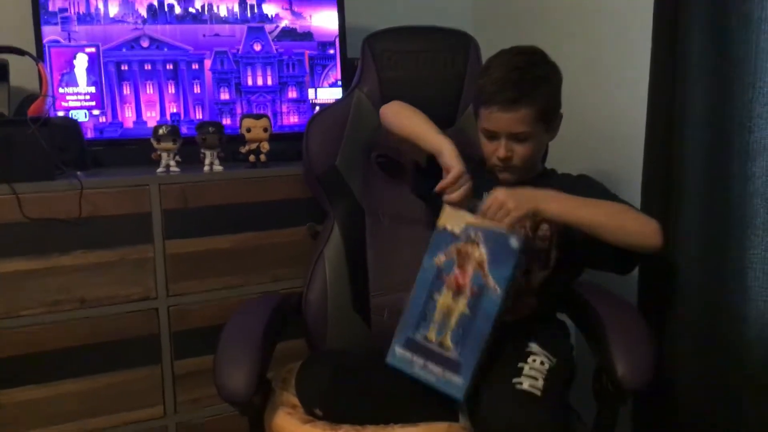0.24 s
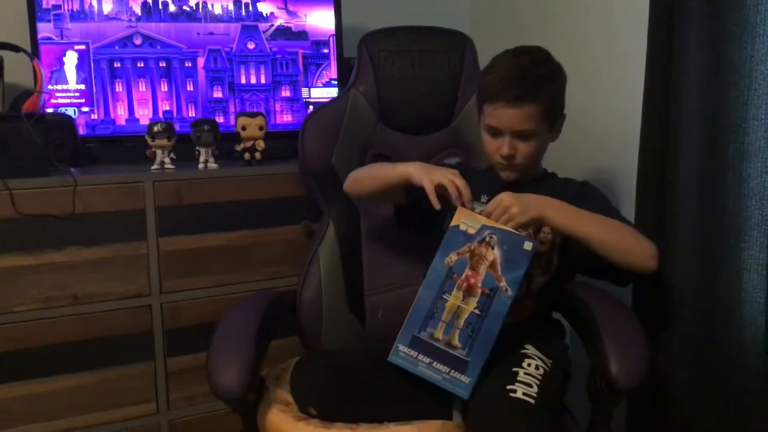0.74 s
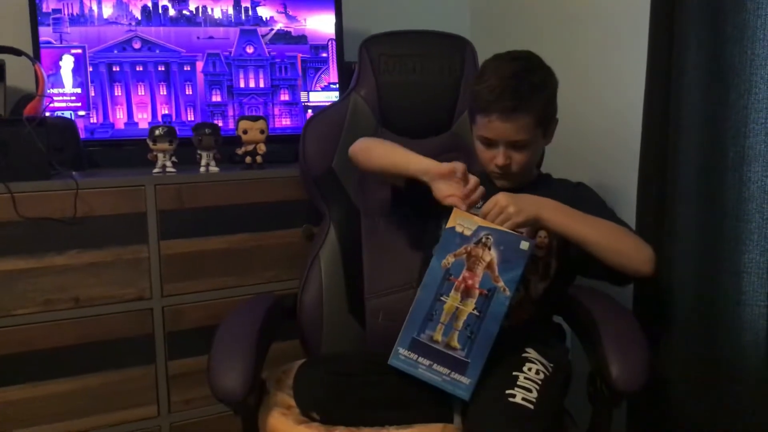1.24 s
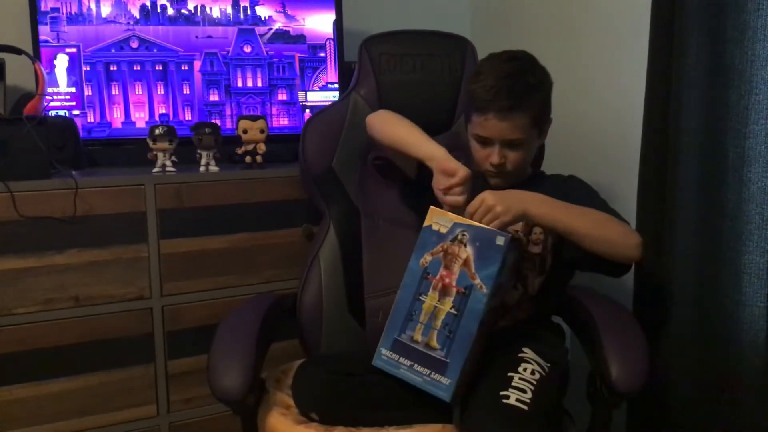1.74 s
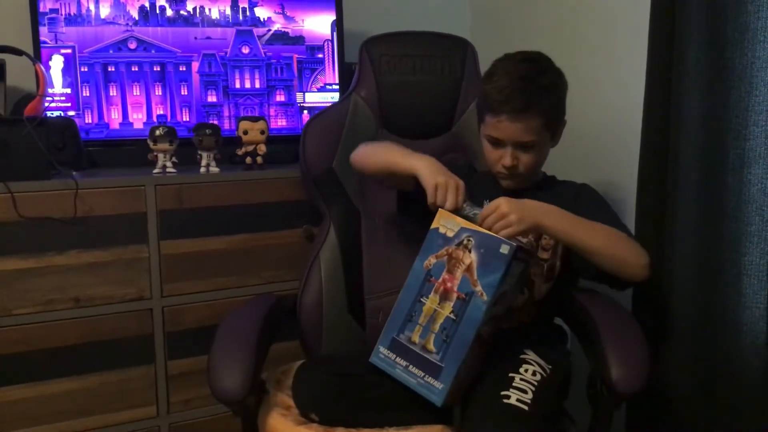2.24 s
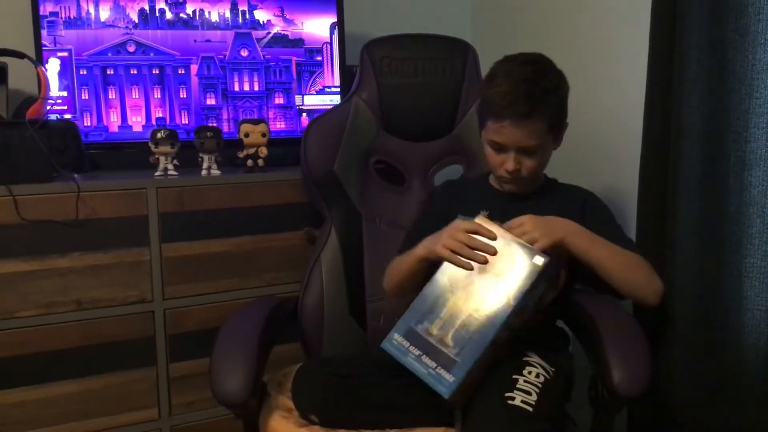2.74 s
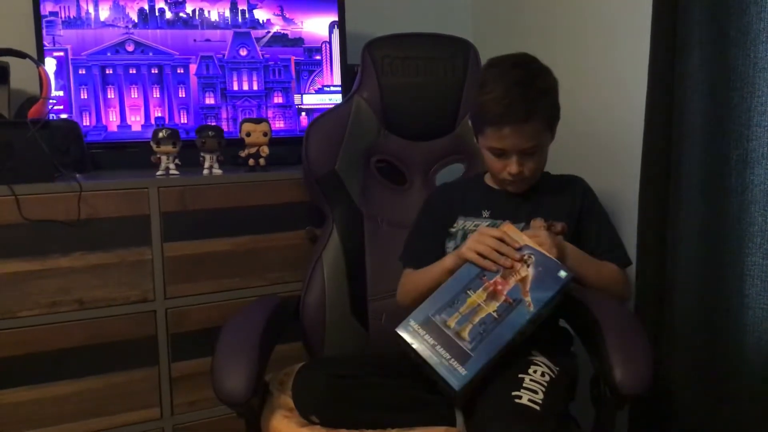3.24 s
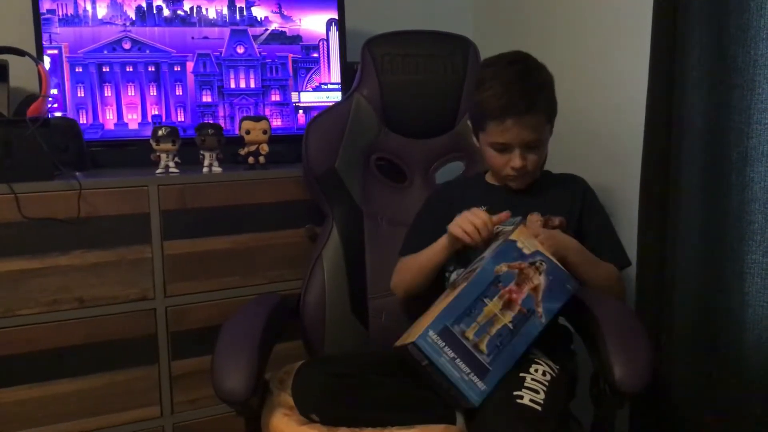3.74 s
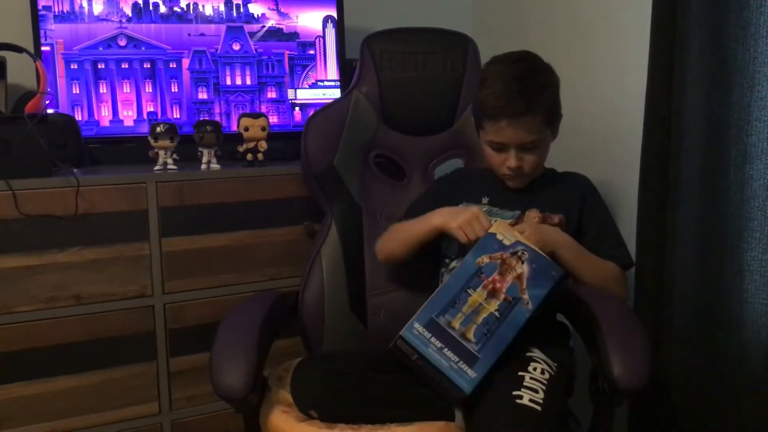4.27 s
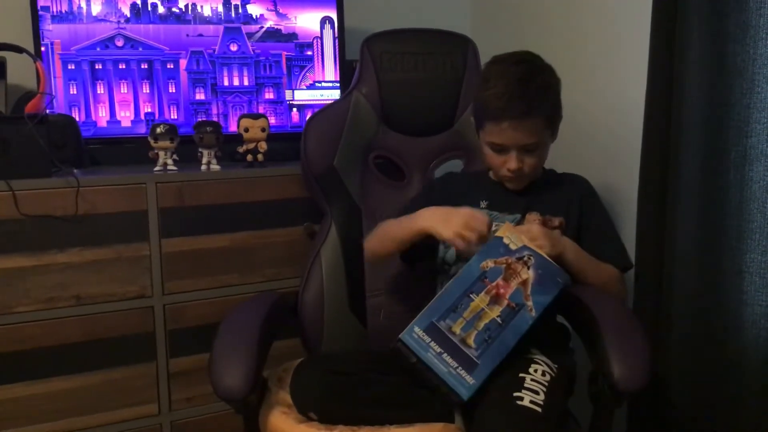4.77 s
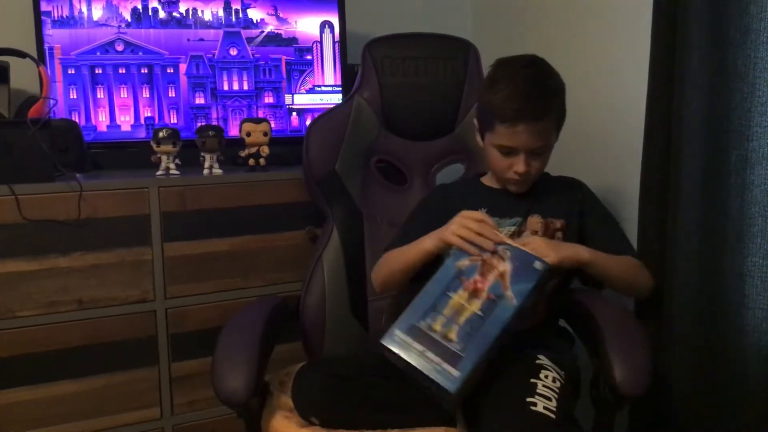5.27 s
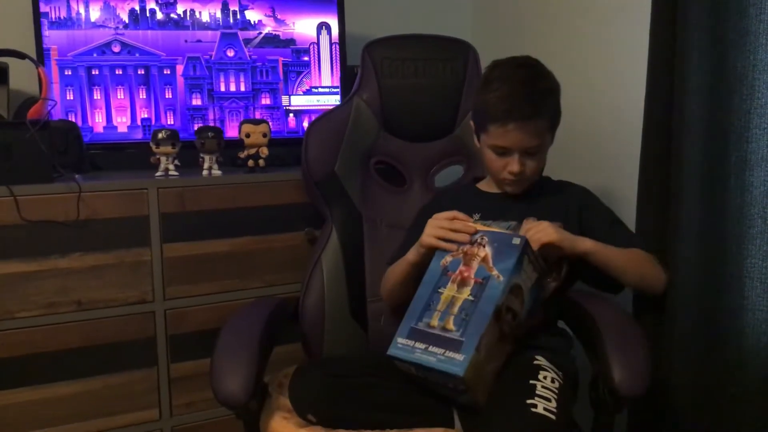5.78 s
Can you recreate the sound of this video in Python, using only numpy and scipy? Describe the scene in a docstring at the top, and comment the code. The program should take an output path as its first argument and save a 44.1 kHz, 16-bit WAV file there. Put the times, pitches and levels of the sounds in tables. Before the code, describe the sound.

Fingernails pick and snap at tape on a small hollow cardboard box, with soft knocks and rubs, growing busier and louder in a quiet room.

```python
"""A quiet furnished room's hiss and a faint fizz of skin come first, then a soft thump, a knock, a click.
Fingers pick at a small cardboard box close to one microphone, the room's reflections lying under it.
Nails snap as coloured noise bursts; fingertip pushes ring the modes of the hollow box; skin rubs as
uneven noise that also stirs the box; thumps of box on lap are low sines sinking in pitch.
Steady noise makes the rumble and hiss, and a narrow band of noise the fan-like hum."""
import sys
import numpy as np
from scipy import signal
from scipy.fft import rfft, irfft
from scipy.io import wavfile
from scipy.ndimage import uniform_filter1d

SR = 44100
rng = np.random.default_rng(int(sys.argv[2]) if len(sys.argv) > 2 else 0)


def store_pcm(level_fs):
    """Save levels as 16-bit WAV."""
    pcm = np.round(np.clip(level_fs, -1, 1) * 32767).astype(np.int16)
    wavfile.write(sys.argv[1], SR, np.atleast_2d(pcm).T)


N = 265041  # length in samples

# nails on tape and card: [t/s, level/dB, centre f/Hz, spread/octaves, crisp top treble level/dB]
NAIL_CLICKS = [(0.168, -54.5, 4800, .85, -4), (0.23, -43, 4200, 1.4, -13), (0.291, -51, 2540, .4, -23),
               (0.3243, -44, 2820, 1.2, -3), (0.938, -55, 2800, 1, -36), (1.5726, -48, 10800, 1, 15),
               (1.6002, -50.5, 4560, 0.42, -3), (1.73, -40.5, 4200, 0.88, -11), (1.7608, -37, 4500, .6, 0),
               (1.7831, -26.5, 4860, 0.83, -13), (1.979, -29.5, 10800, 1.57, -6),
               (2.1862, -46, 11100, 1.2, -8), (2.201, -33, 6060, 0.56, -39), (2.362, -35, 1700, 1.33, -7),
               (2.511, -51, 4100, .73, -2), (2.655, -61.5, 2500, 1, -23), (2.704, -41, 3440, 0.7, -10.5),
               (2.7161, -42.5, 2920, 0.68, -28), (2.825, -48.5, 3900, 1.1, -29),
               (2.847, -60, 5000, 1.3, -15), (2.9393, -56, 6000, 0.66, -18),
               (2.9484, -46.5, 1680, 1.34, -30), (2.986, -45, 5470, 1.6, -23),
               (3.277, -53, 2000, 0.87, -23), (3.352, -49.5, 5100, 0.47, -26), (3.373, -46, 3830, 1, -38),
               (3.7938, -53.5, 1800, 1.4, -35), (3.899, -52.5, 8450, .8, -25),
               (4.084, -57, 6300, 0.45, -27), (4.1016, -45, 7660, 0.92, -35), (4.141, -57, 3300, .5, -22),
               (4.241, -54, 4820, 0.83, -15), (4.3921, -25, 5660, 0.46, -30), (4.457, -36, 4000, 0.55, -13),
               (4.4614, -30.5, 4060, 0.57, -16), (4.465, -31.5, 3380, 1.3, -21),
               (4.479, -29, 5150, 0.72, -13), (4.625, -53.5, 4400, 0.47, -7), (4.7576, -45, 4250, 1.3, -12),
               (4.9858, -43.5, 4440, 0.58, -33), (5.0066, -42, 3060, 0.95, -3),
               (5.0957, -38.5, 1930, 1.6, -8), (5.1002, -33, 1990, 1.6, -27), (5.333, -52, 10500, 0.46, -2),
               (5.347, -42.5, 10500, 0.73, -16), (5.4289, -20, 2180, 1.12, -5), (5.437, -30, 1860, 1.6, -7),
               (5.464, -29.5, 3000, 1.2, -23), (5.4707, -39, 5970, 0.72, -21), (5.7466, -52, 3900, 1.1, -7),
               (5.7622, -26.5, 1830, 1.57, -43), (5.977, -47, 1910, 1.2, -33)]
# fingertips on the box: [t/s, level/dB before the panel cut, f/Hz of the panels struck, contact fade/s]
FINGER_KNOCKS = [(0.163, -46, 297, 0.005), (0.364, -38, 374, 0.0034), (0.391, -41.5, 409, 0.0031),
                 (1.733, -30, 336, 0.0085), (1.787, -30.5, 556, 0.0041), (1.983, -32.5, 390, 0.01),
                 (2.365, -33, 445, 0.0019), (2.511, -37, 402, 0.006), (2.671, -47, 410, 0.0088),
                 (2.712, -28, 400, 0.0031), (2.759, -35.5, 280, 0.008), (2.955, -40, 424, 0.0013),
                 (3.05, -48.5, 406, 0.0064), (3.184, -51.5, 404, 0.0055), (3.277, -39.5, 420, 0.0023),
                 (3.343, -45, 444, 0.018), (3.539, -37.5, 376, 0.0065), (3.574, -33.5, 333, 0.0086),
                 (3.591, -36, 407, 0.002), (3.801, -35, 435, 0.0025), (3.959, -42.5, 442, 0.017),
                 (4.033, -37, 430, 0.0017), (4.24, -38, 503, 0.0043), (4.465, -25.5, 515, 0.0045),
                 (4.475, -21, 378, 0.0091), (4.512, -22.5, 387, 0.005), (4.762, -35.5, 415, 0.023),
                 (4.797, -28.5, 450, 0.015), (4.809, -28, 466, 0.0064), (4.937, -49.5, 515, 0.0073),
                 (5.011, -33, 456, .01), (5.095, -36.5, 434, 0.023), (5.132, -32.5, 487, 0.015),
                 (5.283, -25.5, 410, 0.022), (5.306, -39, 420, 0.0067), (5.368, -26.5, 440, 0.0092),
                 (5.393, -55, 328, 0.0042), (5.434, -16.5, 594, 0.003), (5.465, -22.5, 494, 0.012),
                 (5.614, -43.5, 333, 0.0072), (5.673, -42.5, 466, 0.0025), (5.767, -14.5, 468, 0.0038),
                 (5.983, -36, 550, 0.0008)]
# skin sliding on tape and card: [start t/s, loudest t/s, end t/s, level/dB, centre f/Hz, spread/octaves]
SKIN_STROKES = [(0, 0.048, .17, -66.5, 10900, 1.46), (0.181, 0.233, .46, -67, 3020, 2),
                (1.254, 1.334, 1.6, -70, 13500, 0.77), (1.391, 1.575, 1.76, -66, 13100, 0.78),
                (1.263, 1.39, 1.55, -74, 4000, 0.32), (1.502, 1.698, 1.76, -68.5, 4000, .35),
                (1.602, 1.697, 1.74, -61.5, 8800, 0.33), (1.841, 1.985, 1.98, -60, 10800, 1.76),
                (1.903, 1.915, 1.945, -55.5, 10900, 1), (2.313, 2.358, 2.37, -65, 5460, 1),
                (2.708, 2.74, 2.9, -48, 262, 0.39), (2.769, 2.854, 3.06, -71.5, 3480, 0.88),
                (3.29, 3.34, 3.47, -71, 3400, 0.92), (3.48, 3.585, 3.72, -63, 4300, 1.34),
                (3.58, 3.634, 3.79, -67, 2450, 0.12), (3.598, 3.66, 3.79, -72.5, 3460, 1.15),
                (3.891, 4.029, 4.08, -50, 460, 0.56), (3.892, 3.984, 4.09, -64.5, 1330, 1.75),
                (4.195, 4.24, 4.29, -67.5, 1780, 1.9), (4.367, 4.388, 4.395, -61, 7850, 0.92),
                (4.455, 4.48, 4.6, -51.5, 400, 0.88), (4.581, 4.67, 4.72, -72, 3980, 1.2),
                (4.962, 4.983, 5.09, -63.5, 4000, 0.99), (5.071, 5.105, 5.23, -58.5, 3970, 2.1),
                (5.338, 5.356, 5.44, -49, 11800, 0.49), (5.34, 5.436, 5.44, -51, 2860, 1.1),
                (5.477, 5.566, 5.76, -60, 2320, 1.6), (5.828, 5.998, 6.05, -66, 2010, 1.76)]
# ring of the hollow box stirred by handling: [t/s, level/dB]
BOX_STIR = [(0.0, -74.5), (0.32, -59), (0.45, -72.5), (1.79, -70), (2.59, -89), (2.86, -55), (3.05, -71),
            (3.28, -67), (3.54, -57.5), (3.7, -66), (4.23, -62.5), (4.49, -91), (4.69, -61.5), (4.87, -79),
            (4.97, -60), (5.26, -59.5), (5.34, -55.5), (6.01, -55)]
# box meeting the lap: [t/s, level/dB]
LAP_THUMPS = [(0.063, -48.5), (0.197, -46), (0.231, -34), (0.738, -39), (1.8, -47), (2.754, -41.5),
              (3.348, -50.5), (4.47, -41), (5.039, -45.5), (5.513, -44.5), (5.772, -34.5)]
# modes of the hollow box: [f/Hz, relative level/dB, t60/s]
BOX_MODES = [(219, -6.5, 0.15), (230, -44, 0.059), (303, -1, 0.16), (347, -2, 0.093), (423, -2.5, 0.16),
             (450, 10.5, 0.02), (509, 6.5, 0.048), (615, -3.5, 0.079), (702, -2.5, 0.053), (793, 8, 0.062),
             (897, 11, 0.031), (965, -26, 0.038), (1154, 24, 0.013), (1350, -16, 0.01)]
# broad rings of tape and glossy card: [f/Hz, width/Hz, relative level/dB]
TAPE_RINGS = [(1800, 790, 4.5), (2630, 280, -7), (3380, 2050, -3), (4260, 610, -7), (5010, 540, -2),
              (6230, 970, -12.5), (7650, 920, -10), (9660, 3000, -5), (14030, 3500, -2)]
# reverberation of the furnished room: [f/Hz, t60/s]
ROOM_DECAY = [(200, 0.28), (700, 0.21), (2000, 0.29), (6000, 0.23), (14000, 0.18)]
# spectrum of room rumble and hiss: [f/Hz, relative level/dB]
AIR_SPECTRUM = [(18, -44), (30, -11.5), (109, -2), (165, -1), (227, -0.5), (319, -15), (355, 3), (384, -6),
                (499, -13), (760, -16.5), (822, -22), (1960, -28), (3310, -29), (16000, -39)]

SNAP_FADE_S, SNAP_RISE_S = 0.0026, 0.0012
KNOCK_RISE_S, KNOCK_OCTAVES = 0.0057, 0.44
PANEL_HZ = 206  # the small panels radiate little below this
THUMP_START_HZ, THUMP_END_HZ, THUMP_S = 307, 64.4, 0.025
WET_DB, BOX_WET_DB = -5.5, -5  # room level for the treble sounds and for the knocks
AIR_DB = -59.5
HUM_HZ, HUM_WIDTH_HZ, HUM_DB = 369.7, 7.7, -79.5
LOW_CUT_HZ, EDGE_HZ = 58, 15900  # microphone's bass cut, recorder's upper limit


def clicks():
    """Each nail click is a short lumpy snap coloured by its spot; stray fibres crackle after it.

    Row 0 is the direct sound; row 1 feeds the room, the same colour averaged over all directions."""
    out, size = np.zeros((2, N)), 4096
    lead = 0.003  # seconds kept free ahead of each snap
    t = np.maximum(np.arange(size) / SR - lead, 0)
    hz = np.fft.rfftfreq(size, 1 / SR)
    tick = np.arange(size) == round(lead * SR)
    for s, db, centre_hz, octaves, crisp_db in NAIL_CLICKS:
        noise, lumps, fibres = rng.standard_normal((3, size))
        fall = np.exp(-t / SNAP_FADE_S) * np.minimum(t / SNAP_RISE_S, 1)
        fall = fall * wander(lumps, 30, 2.12)
        crackle = amp(-20) * wander(fibres, 70, 5.5)
        crackle = crackle * np.exp(-t / 0.018) * np.minimum(t / 0.0052, 1)
        snap = noise * (fall + crackle)
        colour = evened(tape(hz, centre_hz, octaves, crisp_db))
        add(out[0], s - lead, amp(db) * shaped(snap, colour))
        # a single tick with the energy of the snap
        add(out[1], s - lead, amp(db) * np.linalg.norm(snap) * shaped(tick, colour))
    return out


def tape(hz, centre_hz, octaves, crisp_db=-60):
    """The rings of the tape and card, strongest near the centre, with some crisp top treble."""
    rings = 0.34 + sum(amp(db) / (1 + (2 * (hz - f) / width) ** 2) for f, width, db in TAPE_RINGS)
    return rings * (near(hz, centre_hz, octaves) + amp(crisp_db) * near(hz, 11900, 0.44))


def knocks():
    """A fingertip lands as a soft uneven contact that sets the box ringing."""
    out, size = np.zeros(N), 2000
    t = np.arange(size) / SR
    for s, db, centre_hz, contact_s in FINGER_KNOCKS:
        noise = rng.standard_normal(size)
        push = uniform_filter1d(uniform_filter1d(noise, 15), 15)  # smoothed twice: soft skin
        push = push * np.exp(-t / max(contact_s, 3e-4)) * np.minimum(t / KNOCK_RISE_S, 1)
        bend = 1 + 0.028 * rng.standard_normal(len(BOX_MODES))  # differs by chance at every knock
        ring = signal.fftconvolve(push, box(centre_hz, KNOCK_OCTAVES, bend))
        add(out, s - 0.003, amp(db) * ring / abs(ring).max())
    return signal.sosfilt(signal.butter(2, PANEL_HZ, "high", fs=SR, output="sos"), out)


def box(centre_hz, octaves, bend):
    """The ring of the hollow box pushed at a spot near centre_hz; bend scales each mode's pitch."""
    t, ring = np.arange(4000) / SR, 0
    for (f, db, t60), b in zip(BOX_MODES, bend):
        push = near(f, centre_hz, octaves) + 0.039  # every mode is pushed a little
        ring = ring + push * amp(db - 60 * t / t60) * np.sin(2 * np.pi * f * b * t)
    return ring


def rub():
    """Sliding skin catches in tiny uneven slips: each stroke fizzes, and the box is stirred."""
    out, hz = np.zeros(N), np.fft.rfftfreq(SR, 1 / SR)
    for start, peak, end, db, centre_hz, octaves in SKIN_STROKES:
        t = np.arange(max(start, 0), end, 1 / SR)
        slips, quick, slow = rng.standard_normal((3, SR))
        grip = wander(quick, 130, 2.8) * wander(slow, 800, 2.0)
        fizz = evened(shaped(grip * slips, tape(hz, centre_hz, octaves)))
        swell = np.interp(t, [start, peak, end], [0, 1, 0])
        add(out, t[0], amp(db) * fizz[:len(t)] * swell)
    handling, grip = rng.standard_normal((2, N))
    handling = handling * wander(grip, 500, 2.5)
    stir = evened(signal.fftconvolve(handling, box(414, 0.5, np.ones(len(BOX_MODES))))[:N])
    stir_db = np.interp(np.arange(N) / SR, *np.transpose(BOX_STIR))
    return out + amp(stir_db) * stir


def thumps():
    """A soft blow on the lap: a few low cycles that sink in pitch and are soon smothered."""
    out, t = np.zeros(N), np.arange(8000) / SR
    hz = THUMP_END_HZ + (THUMP_START_HZ - THUMP_END_HZ) * np.exp(-t / 0.0085)
    shape = np.exp(-(t / THUMP_S) ** 2) * np.minimum(t / 0.001, 1)
    for s, db in LAP_THUMPS:
        add(out, s, amp(db) * shape * np.sin(2 * np.pi * np.cumsum(hz) / SR))
    return out


def room(x):
    """Dense reflections from 6 ms on, each band dying at its own speed; their mix turns over steadily."""
    taps = rng.standard_normal((3, SR // 2))
    taps[:, :260] = 0
    hz, t, z = signal.stft(taps, SR, nperseg=256)
    decay = amp(-60 * t / read(ROOM_DECAY, hz)[:, None])
    tails = signal.istft(z * decay, SR, nperseg=256)[1]
    # the gains into the three tails rotate while their summed power holds
    turn = np.pi * (np.arange(N) / SR * 1.3 + np.arange(3)[:, None] / 3)
    fed = x * np.sqrt(2 / 3) * np.cos(turn)
    return signal.fftconvolve(fed, tails / np.linalg.norm(tails[0]), axes=1).sum(0)[:N]


def air():
    """Steady room rumble and hiss with a slightly wavering level, and one fuzzy fan-like hum."""
    hz = np.fft.rfftfreq(N, 1 / SR)
    wash = evened(shaped(rng.standard_normal(N), amp(read(AIR_SPECTRUM, hz))))
    waver = wander(rng.standard_normal(N), 6000, 1.0)
    resonance = 1 / (1 + (2 * (hz - HUM_HZ) / HUM_WIDTH_HZ) ** 2)
    hum = evened(shaped(rng.standard_normal(N), resonance))
    return amp(AIR_DB) * waver * wash + amp(HUM_DB) * hum


def amp(db):
    """Decibels to gain."""
    return 10 ** (np.asarray(db) / 20)


def evened(x):
    """Scales to rms 1."""
    return x / np.sqrt(np.mean(x ** 2) + 1e-20)


def wander(noise, samples, depth_db):
    """An uneven gain: noise smoothed over some samples, read as decibels of rms depth_db."""
    return amp(depth_db * evened(uniform_filter1d(noise, samples)))


def read(points, hz):
    """Reads a spectrum on a log-frequency axis."""
    f, value = np.transpose(points)
    return np.interp(np.log(hz + 1), np.log(f + 1), value)


def near(hz, centre_hz, octaves):
    """Bell-shaped weight around a centre frequency."""
    return np.exp(-0.5 * (np.log2((hz + 1) / centre_hz) / max(octaves, 0.04)) ** 2)


def shaped(x, gain):
    """Colours x by a gain for each of its Fourier bins."""
    return irfft(rfft(x) * gain, len(x))


def add(mix, s, sound):
    """Mixes a sound in at time s in seconds."""
    part = mix[round(s * SR):][:len(sound)]
    part += sound[:len(part)]


def scene():
    """Hands and box in the room, over the background."""
    (snaps, scattered), rubbing, body = clicks(), rub(), knocks()
    wet = room(amp(WET_DB) * (scattered + rubbing) + amp(BOX_WET_DB) * body)
    return (snaps + rubbing + body + wet + thumps() + air())[None]


def record(dry):
    """The microphone's bass cut, then the band limit of the recorder."""
    thin = signal.sosfilt(signal.butter(3, LOW_CUT_HZ, "high", fs=SR, output="sos"), dry)
    band_limit = signal.firwin(401, EDGE_HZ, window=("kaiser", 9), fs=SR)
    return signal.oaconvolve(thin, band_limit[None], "same")


dry = scene()
out = record(dry)
store_pcm(out)
```